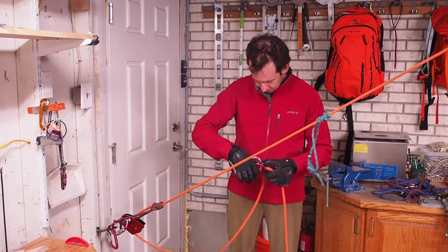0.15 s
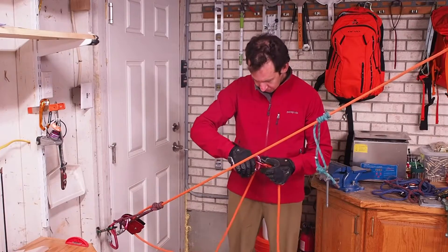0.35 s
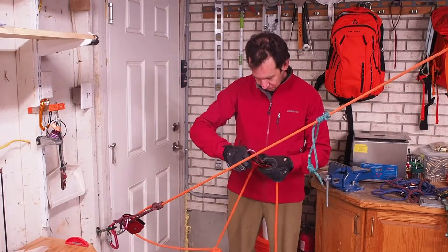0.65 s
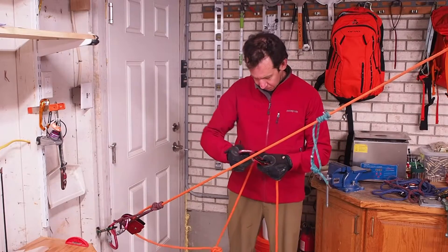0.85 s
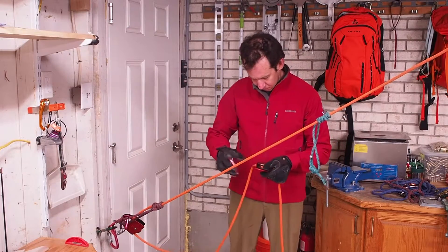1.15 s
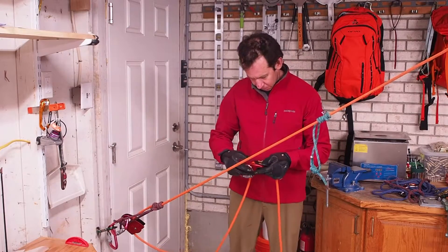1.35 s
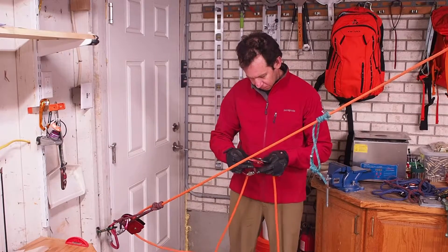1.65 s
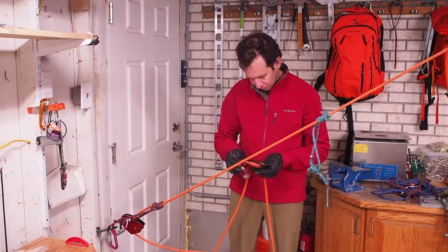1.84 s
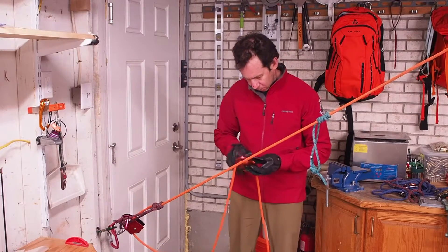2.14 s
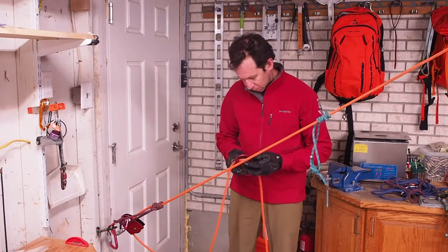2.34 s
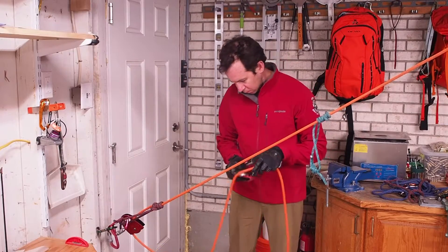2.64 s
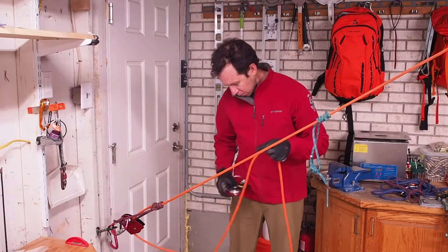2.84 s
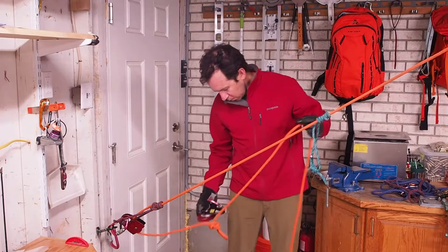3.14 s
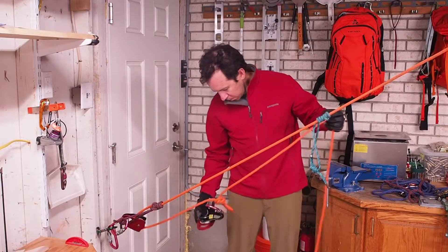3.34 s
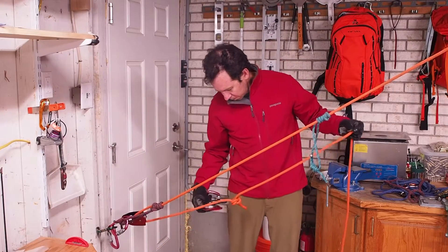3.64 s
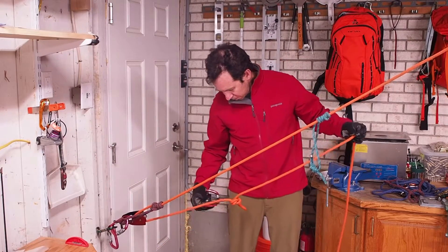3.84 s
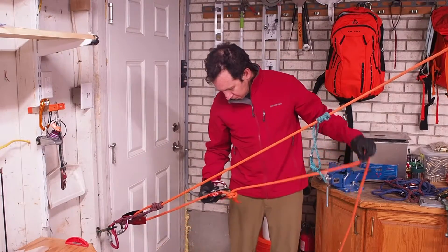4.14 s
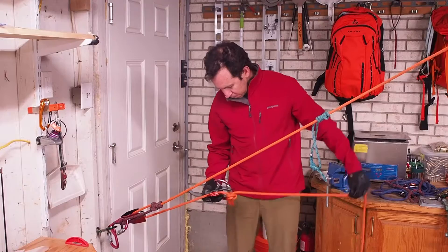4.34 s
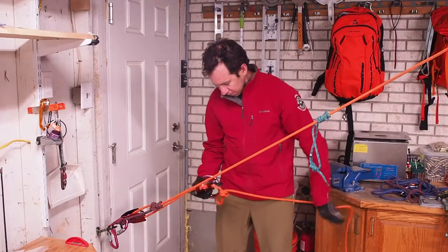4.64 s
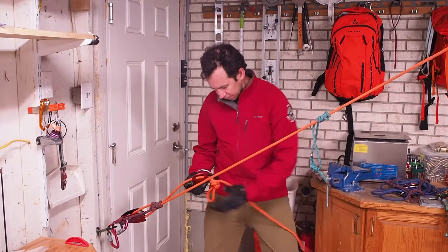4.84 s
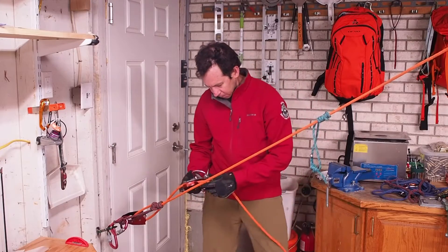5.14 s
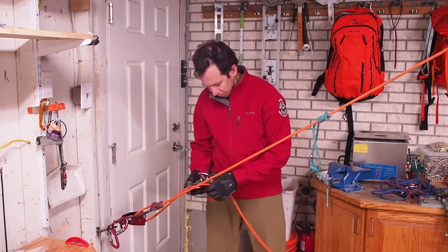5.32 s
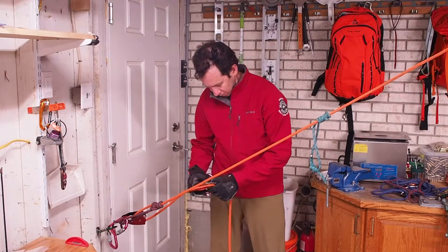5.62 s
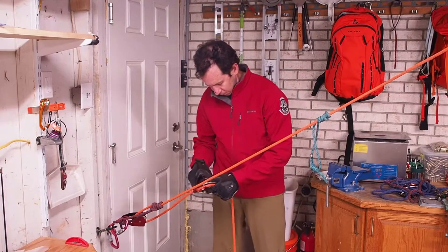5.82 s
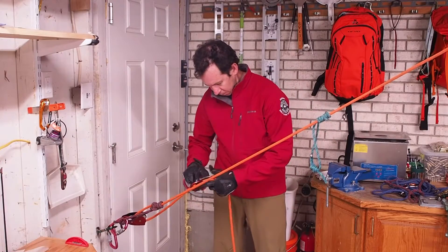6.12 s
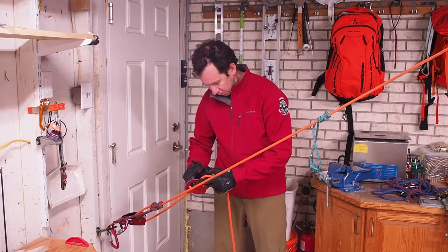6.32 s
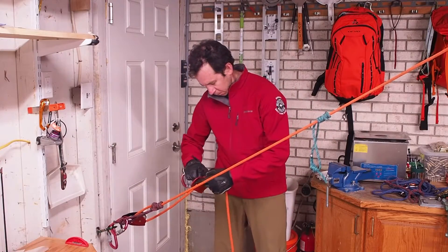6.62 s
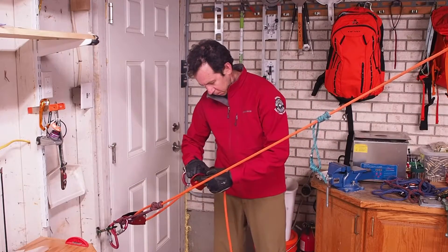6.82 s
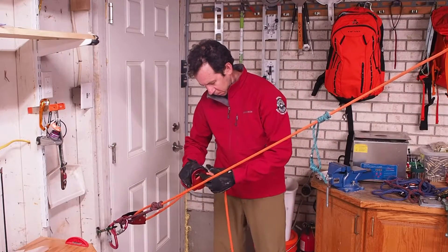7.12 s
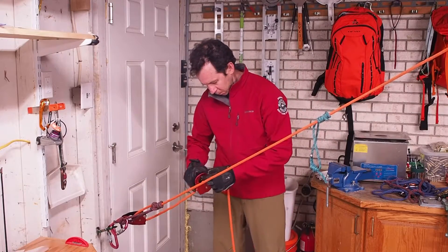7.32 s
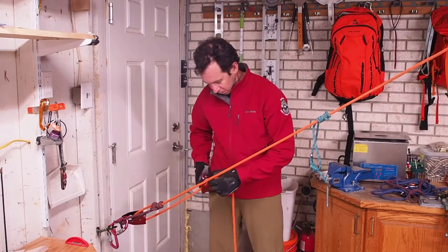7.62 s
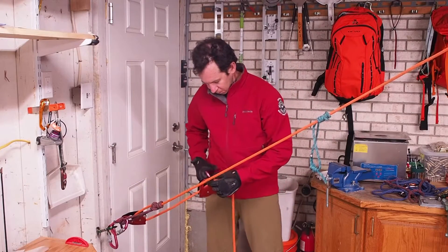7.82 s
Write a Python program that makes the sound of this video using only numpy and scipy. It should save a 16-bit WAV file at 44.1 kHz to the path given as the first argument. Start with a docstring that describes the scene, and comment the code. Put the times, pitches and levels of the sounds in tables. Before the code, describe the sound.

A metal rope pulley scrapes, rattles and clicks lightly from the start, ending in a hard clack at 0.9 seconds. Right after, at 1 second, a carabiner gate snaps shut with a bright crack and a very high ring, the loudest sound. Two smaller pulley clacks follow around 1.4 and 1.6 seconds. At 1.9 seconds aluminium carabiners slide with a soft rustle, then clink several times from 2.2 to 2.7 seconds. A faint slide comes at 3.1 and a dull rope thud at 3.5. Light clinks return from 4.2 to 4.4 seconds and again near 5.3, with jacket rustle, rope running through gloves and soft thuds between. From 5.5 seconds to nearly 8 there are only faint rubs, ticks and dull knocks. The stereo microphone stands a few metres away in a brick garage, with a short echo and low, steady room tone.

```python
"""A rope pulley scrapes and clacks, a few metres from a stereo microphone in a brick garage.
A sprung gate snaps shut, aluminium carabiners slide and clink, and rope drops on the floor as a
climber rigs up. Each metal blow is a broad clack plus ringing modes, and the hard walls answer it.
Gloves and jacket rustle over low room tone; the two hardest hits drive the recorder's limiter."""
import sys
import numpy as np
from scipy import signal
from scipy.fft import rfft, irfft, next_fast_len
from scipy.io import wavfile
from scipy.ndimage import uniform_filter1d

SR = 44100
rng = np.random.default_rng(int(sys.argv[2]) if len(sys.argv) > 2 else 0)


def transcribe(u):
    """Save the signal u as a 16-bit wav file named by the first command-line argument.

    u: samples, shape (n,) or (channels, n), limited to [-1, 1]; the rate is SR.
    q: integer samples, one column per channel.
    """
    v = np.clip(np.atleast_2d(u).T, -1, 1)
    q = np.round(v * 32767).astype(np.int16)
    wavfile.write(sys.argv[1], SR, q)


N = 351477

# blows on the pulley: (time [s], level [dB], brightness [dB], favoured frequency [Hz])
PULLEY_HITS = [(0.2131, -40, 3, 4300), (.234, -26, 4.5, 4740), (.393, -32.5, 4, 2080),
               (0.4432, -28, 7, 3460), (0.7476, -25.5, 6, 4740), (.881, -9.5, 10, 2710),
               (1.3515, -18.5, 4.5, 4330), (1.5527, -24.5, 3, 3460)]
# scrapes, rattles and faint ticks of the pulley and rope:
# (time [s], level [dB], hollowness [dB], rise [s], decay [s])
SCRAPES_AND_TICKS = [(0, -45.5, -2, 0.00087, .015), (.113, -43.5, 10.5, 0.00077, .047),
                     (0.157, -42, 9, 0.0011, 0.022), (.377, -48, -2, 0.0025, .005),
                     (.523, -48.5, 30, 0.0066, .007), (.703, -38, 6.5, 0.00065, 0.11),
                     (.8, -34.5, 8.5, 0.033, 0.012), (1.456, -39, 12.5, 0.013, 0.012),
                     (4.866, -48, 10, 0.0034, .012), (5.575, -52.5, 9, 0.024, .009),
                     (6.906, -65, 6, 0.0016, 0.0036), (7.486, -57, 6, .004, .01)]
# carabiners knocking: (time [s], level [dB], brightness [dB], favoured frequency [Hz], its boost [dB])
CARABINER_HITS = [(2.252, -23.5, -1.5, 3257, -2), (2.339, -22, -0.5, 3257, 11), (2.4275, -27, 3, 6195, 7),
                  (2.481, -38, 4, 7520, 3), (2.6555, -25.5, 5.5, 7480, 4.5), (2.696, -32.5, 4, 3257, 5.5),
                  (4.199, -38.5, 3, 7520, 3.5), (4.281, -46.5, -3, 4690, 4), (4.349, -47.5, -3, 4630, 6),
                  (4.4068, -34, -0.5, 4630, 10), (5.2647, -27, 2, 3758, 5.5), (5.37, -34.5, 1.5, 4690, 7)]
# carabiners sliding: (time [s], level [dB], rise [s], favoured frequency [Hz], its boost [dB])
CARABINER_SLIDES = [(1.912, -36.5, 0.044, 4350, 16), (3.12, -43.5, 0.049, 4700, 6)]
# ringing modes of each metal part: (frequency [Hz], relative energy [dB], t60 [s])
PULLEY_MODES = [(850, -21, 0.066), (1593, -6.5, 0.24), (1820, -19.5, 0.044), (2080, -10, 0.025),
                (2170, -0.5, 0.02754), (2710, 0, 0.0181), (3354, -4, 0.0558), (3460, -2.5, 0.035),
                (4130, 2, 0.023), (4330, -6.5, 0.025), (4740, 7, 0.0083), (5480, -3, .02),
                (6150, -5, 0.022), (7710, -0.5, 0.014), (9370, -4, 0.0765), (10280, -5, 0.0093),
                (10980, -4, 0.23), (12340, -16.5, .04), (13250, -2.5, 0.0336), (15110, -25.5, .05)]
GATE_MODES = [(13340, -17, .08), (12500, -17, 0.09), (12900, -9, 0.15), (13970, -4.5, 0.082),
              (13040, -12.5, 0.13), (14570, -8, 0.14), (13800, -22, 0.11), (14250, -7, 0.1),
              (13800, -27, 0.14), (14660, -35, 0.12), (13400, -18, 0.091), (13730, 3, 0.13),
              (14790, -1.5, 0.051)]
CARABINER_MODES = [(1673, -8, 0.12), (1774, -2.5, 0.058), (3257, 1, 0.15), (3720, -3.5, 0.019),
                   (3758, -0.5, 0.075), (4350, -10, 0.11), (4700, -1, 0.021), (5980, -3.5, 0.0087),
                   (6195, 0.5, 0.052), (7550, 1.5, 0.051), (8630, -7, 0.029), (10200, -31, 0.11),
                   (10470, -11.5, 0.03), (11000, -13.5, 0.099), (11480, -7, .05), (14000, 2, 0.084),
                   (13850, -4, .05), (14820, -9, .08), (15480, -2, .05)]
# the crowd of short-lived modes that makes each part's clack: (frequency [Hz], gain [dB])
PULLEY_CLACK = [(100, -37), (600, -25), (800, -9.5), (1250, -15.5), (1550, -2.5), (2700, -5), (3500, 5.5),
                (4700, 0.5), (5200, -3.5), (7400, -4.5), (8300, -9.5), (11300, -13), (12400, -20),
                (15500, -15)]
GATE_CLACK = [(120, -27), (900, -18), (1600, -11), (2900, -10), (3400, -1), (4400, -1), (5200, -4),
              (6500, -3), (7500, -1), (11000, -1), (12200, -2), (13300, 3), (15100, 1), (16000, -12)]
CARABINER_CLACK = [(100, -32), (800, -19.5), (1250, -9), (1650, -2), (2900, -1.5), (3700, 0), (4700, 3.5),
                   (5300, -3), (7700, -10), (9500, -10), (11500, -10.5), (12400, -26), (13600, 5),
                   (15500, -14)]
# rope falls, dull knocks and glove rubs: (time [s], level [dB], bass [dB], decay [s], resonance [Hz])
THUDS = [(1.215, -47, 9, 0.025, 358), (3.5, -39, 4, 0.048, 850), (3.621, -58, 4, 0.046, 850),
         (4.787, -45.5, 3, 0.019, 350), (5.01, -47, 6.5, 0.018, 308), (5.509, -51, -9, .028, 1600),
         (6.135, -53.5, -5, 0.026, 1060), (7.115, -57, 0, 0.029, 1050), (7.362, -46.5, 4, 0.045, 2110)]
# rope through the gloves and sweeps of the jacket: (time [s], hold [s], relative level [dB])
RUSTLE_STROKES = [(1.914, 0.17, -52), (2.208, 0.025, -52.5), (4.512, 0.37, -56), (4.853, 0.29, -48),
                  (5.3, 0.16, -56.5), (5.75, .03, -58), (6.166, 0.027, -60), (6.52, 0.077, -63),
                  (7.103, 0.061, -60), (7.468, 0.16, -56), (7.612, .005, -52), (7.797, .15, -63.5)]
# spectra of the thuds, the cloth and the room tone: (frequency [Hz], gain [dB])
THUD_COLOUR = [(45, -22), (85, 1.5), (145, 2), (225, -10.5), (390, -4.5), (610, -2), (860, 0.5),
               (1170, -4.5), (1620, -9), (2550, -15.5), (5100, -24.5), (14800, -40.5)]
RUSTLE_COLOUR = [(100, -2), (400, -2.5), (900, 13), (1300, 6), (2000, 9), (2800, 3), (4000, 8.5),
                 (6000, 2.5), (9000, 3.5), (12000, -2), (14000, 7.5), (16000, -11)]
ROOM_TONE_COLOUR = [(15, -34), (25, -10), (141, 0), (263, -15), (335, -12.5), (463, -10), (516, -11),
                    (988, -18), (1070, -14), (1290, -15.5), (2690, -19.5), (3430, -18.5), (8360, -24.5),
                    (14000, -24), (16000, -18.5)]
# room and fan resonances: (frequency [Hz], width [Hz], boost [dB])
ROOM_RESONANCES = [(134, 40, 0), (306, 71, 4.5), (914, 198, 8)]
# likeness of left and right at the microphone: (frequency [Hz], correlation [0-1])
STEREO_CORRELATION = [(60, 0.49), (300, 0.22), (700, 0.6), (1400, 0.61), (3000, 0.056), (7000, .03)]
# reverberation of the brick garage: (frequency [Hz], t60 [s])
GARAGE_T60 = [(160, 0.59), (650, 0.39), (1450, 0.54), (3400, 0.44), (6400, 0.39), (9800, 0.36),
              (14500, 0.26)]

TAIL = np.arange(24576) / SR  # time axis of one blow and its echo [s]
FIRM_DB = -28  # level of an ordinary firm blow


def pulley(crash=0.26):
    """Side plates and sheave clack on the carabiner; the harder the blow, the more crash and less ring."""
    mix = np.zeros((2, N))
    for s, db, bright_db, favoured_hz in PULLEY_HITS:
        shape = strike(db, bright_db, low_db=4.5, top_db=1.5, thinning=0, rise_s=0.00067)
        ring_db = -1 - crash * (db - FIRM_DB)
        blow = metal(shape, PULLEY_MODES, PULLEY_CLACK, ring_db, grit_db=0.28, impact=1.7, click=0.42,
                     detune=0.0102, favoured_hz=favoured_hz, favour_db=9.5)  # plates shift between blows
        add(mix, s, garage(blow, db, direct_db=-8.5, early_db=5.0, pan_db=0.5))
    return mix


def scrapes_and_ticks(high_db=2, top_db=5):
    """Pulley and rope scrape, rattle and faintly tick: long or short runs of slips, more or less hollow."""
    mix = np.zeros((2, N))
    for s, db, hollow_db, rise_s, decay_s in SCRAPES_AND_TICKS:
        shape = (hollow_db, high_db, top_db, rise_s, decay_s)
        slips = metal(shape, PULLEY_MODES, PULLEY_CLACK, ring_db=-7, grit_db=1.2, impact=1.5,
                      detune=0.011, favoured_hz=4330, favour_db=5)
        add(mix, s, garage(slips, db, direct_db=-4.0, early_db=-4))
    return mix


def gate_snap(at_s=0.9823, top_db=0.5, chatter_s=0.00073):
    """The spring throws the gate on the nose: a central crack, with a very high ring beamed to the right."""
    mix = np.zeros((2, N))
    shape = (0, 0, top_db, 0, chatter_s)
    snap = metal(shape, GATE_MODES, GATE_CLACK, ring_db=2.5, grit_db=1.5, impact=3.4,
                 detune=0.00027, click=1)
    left, right = garage(snap, level_db=-0.5, direct_db=-9.0, early_db=10, pan_db=7.0)
    # (frequency [Hz], shift to right [dB]); below 7 kHz it cancels the pan
    beam = [(7000, 7), (8500, -4.5), (11000, 4), (13000, 13.5)]
    left = colour(left, [(hz, -db / 2) for hz, db in beam])
    right = colour(right, [(hz, db / 2) for hz, db in beam])
    add(mix, at_s, np.array([left, right]))
    return mix


def carabiner_clinks():
    """Open aluminium loops knock together and ring clearly."""
    mix = np.zeros((2, N))
    for s, db, bright_db, favoured_hz, favour_db in CARABINER_HITS:
        shape = strike(db, bright_db, low_db=-2.2, top_db=-7.0, thinning=0.78, rise_s=0.0029)
        blow = metal(shape, CARABINER_MODES, CARABINER_CLACK, ring_db=-1.5, grit_db=2.0, impact=1.0,
                     detune=0.00049, favoured_hz=favoured_hz, favour_db=favour_db)
        add(mix, s, garage(blow, db, direct_db=-6.0, early_db=1.0, pan_db=0.1))
    return mix


def carabiner_slides(low_db=2, high_db=1, top_db=-5, decay_s=0.005):
    """Aluminium rubs on aluminium: slips swell until the loop seats, and set it singing."""
    mix = np.zeros((2, N))
    for s, db, rise_s, favoured_hz, favour_db in CARABINER_SLIDES:
        shape = (low_db, high_db, top_db, rise_s, decay_s)
        slide = metal(shape, CARABINER_MODES, CARABINER_CLACK, ring_db=-3, grit_db=3.1, impact=1.0,
                      detune=0.00028, favoured_hz=favoured_hz, favour_db=favour_db)
        add(mix, s, garage(slide, db, direct_db=-5.0, early_db=-3))
    return mix


def thuds(hollow_db=6, rise_share=0.43):
    """Rope and gloves land or rub without ringing: a spread-out push with one broad resonance."""
    mix = np.zeros((2, N))
    for s, db, bass_db, decay_s, hollow_hz in THUDS:
        treble_db = 2 + 4 * np.log2(hollow_hz / 1000)  # smaller things sound higher and crisper
        force = contact(rise_share * decay_s, decay_s, grit_db=2.3, impact=0.5)
        push = colour(force, THUD_COLOUR)
        push = colour(push, [(150, bass_db), (700, 0), (1000, 0), (2000, treble_db)])
        push = colour(push, [(hollow_hz * 0.64, 0), (hollow_hz, hollow_db), (hollow_hz * 1.5, 0)])
        add(mix, s, garage(push, db, direct_db=1.5, early_db=-28))
    return mix


def rustle(attack_s=0.023, release_s=0.067, clump_s=0.006, grain_db=1.5, gain_db=4):
    """Fibres catch and slip in small clumps as the hands move; each stroke rises, holds and dies away."""
    t = np.arange(N) / SR
    strokes = []
    for s, hold_s, db in RUSTLE_STROKES:
        rise = np.clip((t - s) / attack_s, 0, 1)
        fall = np.exp(-np.maximum(t - s - attack_s - hold_s, 0) / release_s)
        strokes.append(amp(db) * rise * fall)
    speed = np.linalg.norm(strokes, axis=0)
    knots = np.arange(0, N / SR, clump_s)
    clumps = amp(grain_db * np.interp(t, knots, rng.standard_normal(len(knots))))
    return amp(gain_db) * speed * clumps * diffuse(lambda hz: amp(read(RUSTLE_COLOUR, hz)))


def room_tone(level_db=-49.5):
    """Steady low murmur of the building, with microphone hiss on top."""
    def gain_at(hz):
        humps_db = sum(db * np.exp(-((hz - f) / width) ** 2) for f, width, db in ROOM_RESONANCES)
        return amp(read(ROOM_TONE_COLOUR, hz) + humps_db)
    return amp(level_db) * diffuse(gain_at)


def strike(db, bright_db, low_db, top_db, thinning, rise_s, dulling=0.347):
    """Shape of a blow for metal(): dull and chattering when gentle, bright and short when firm."""
    softer_db = FIRM_DB - db
    low = low_db + dulling * softer_db - thinning * bright_db
    chatter_s = 0.0019 * 2 ** (softer_db / 22)  # doubles for a blow 22 dB softer
    return low, bright_db, bright_db + top_db, rise_s, chatter_s


def contact(rise_s, chatter_s, grit_db, impact):
    """Force between two parts: a brief impact, then dying tiny slips; a slow rise makes it a scrape."""
    rise_s = np.clip(rise_s, 3e-4, 0.08)
    swell = np.minimum(TAIL / rise_s, 1)
    fall = np.exp(-np.maximum(TAIL - rise_s, 0) / max(chatter_s, 1e-4))
    first_touch = 1 + impact * np.exp(-TAIL / 0.0011)
    uneven = amp(grit_db * np.repeat(rng.standard_normal(len(TAIL) // 32), 32))
    return unit(swell * fall * first_touch * uneven * rng.standard_normal(len(TAIL)))


def metal(shape, modes, clack, ring_db, grit_db, impact, detune, favoured_hz=0, favour_db=0, click=0):
    """A broad clack and ringing modes; the point of contact favours one pitch and tilts the rest."""
    low_db, high_db, top_db, rise_s, chatter_s = shape
    square_hit = click * (TAIL == 0)  # one clean click at the start
    force = unit(contact(rise_s, chatter_s, grit_db, impact) + square_hit)
    ring = np.zeros(len(TAIL))
    for hz, db, t60 in modes:
        boost_db = favour_db * np.exp(-((hz - favoured_hz) / 150) ** 2)
        ring_s = t60 * (1 + max(0.03 * boost_db, 0))  # a favoured mode is also less damped
        keep = amp(-120 / (ring_s * SR))
        energy = signal.lfilter([1 - keep], [1, -keep], force ** 2)  # slips feed it, gloves damp it
        gain = amp(db + boost_db + rng.uniform(-3, 3))
        pitch_hz = hz * (1 + detune * rng.standard_normal())
        ring += gain * np.sqrt(energy) * np.sin(2 * np.pi * (pitch_hz * TAIL + rng.random()))
    body = unit(colour(force, clack)) + amp(ring_db) * unit(ring)
    tilt = [(2200, low_db), (3200, 0), (5000, 0), (6500, high_db), (11000, high_db), (13200, top_db)]
    return colour(body, tilt)


def garage(sound, level_db, direct_db, early_db, pan_db=0, early_s=0.015, build_s=0.0012):
    """At the microphone: direct sound, a quick cluster off the near door and bench, then the brick tail."""
    hz, t, noise = signal.stft(rng.standard_normal((3, len(TAIL))), SR, nperseg=256, noverlap=128)
    same = np.clip(read(STEREO_CORRELATION, hz), 0, 1)[:, None]
    pair = np.sqrt(1 - same) * noise[:2] + np.sqrt(same) * noise[2]
    late = amp(-60 * t / read(GARAGE_T60, hz)[:, None])
    early = amp(early_db) * np.exp(-t / early_s)
    walls = signal.istft(pair * (late + early), SR)[1][:, :len(TAIL)]
    walls *= 1 - np.exp(-TAIL / build_s)
    response = unit(walls) * np.sqrt(2) + amp(direct_db) * (TAIL == 0)
    heard = signal.fftconvolve(sound[None], response, axes=1)[:, :len(TAIL)]
    heard *= amp([[pan_db / 2], [-pan_db / 2]])  # positive is left
    return amp(level_db) * unit(heard) * np.sqrt(2 * SR * 0.078)  # level: rms if packed into 78 ms


def diffuse(gain_at):
    """Noise from all round the microphone, rms one; left and right are more alike in the bass."""
    size = next_fast_len(N, True)
    hz = np.fft.rfftfreq(size, 1 / SR)
    left, other = rfft(rng.standard_normal((2, size)))
    same = np.clip(read(STEREO_CORRELATION, hz), 0, 1)
    right = same * left + np.sqrt(1 - same ** 2) * other
    noise = irfft(np.array([left, right]) * gain_at(hz), size)[:, :N]
    return unit(noise) * np.sqrt(2 * N)


def colour(x, points):
    """Causal (minimum-phase) filter, so that attacks stay sharp."""
    hz = abs(np.fft.fftfreq(len(x), 1 / SR))
    log_gain = np.log(amp(read(points, hz)))
    response = np.exp(signal.hilbert(log_gain).conj())[:len(x) // 2 + 1]
    return irfft(rfft(x) * response, len(x))


def amp(db):
    """Decibels to gain."""
    return 10 ** (np.asarray(db) / 20)


def unit(x):
    """Scales to an energy of one."""
    return x / np.sqrt(np.sum(x ** 2) + 1e-20)


def read(points, hz):
    """Reads a table on a log-frequency axis."""
    f, value = np.transpose(points)
    return np.interp(np.log(hz + 1), np.log(f + 1), value)


def add(mix, s, sound):
    """Mixes a stereo sound in at time s."""
    part = mix[:, max(round(s * SR), 0):][:, :sound.shape[1]]
    part += sound[:, :part.shape[1]]


def scene():
    """The garage as it reaches the microphone, a few metres from the climber."""
    gear = pulley() + scrapes_and_ticks() + carabiner_clinks() + carabiner_slides() + gate_snap()
    return gear + thuds() + rustle() + room_tone()


def record(dry, threshold=1.0, release_s=0.078, attack_s=0.00103, lopsided=0.28, edge_hz=15900):
    """A limiter ducks after the hardest hits; their first millisecond clips. A low-pass follows."""
    over_db = np.maximum(20 * np.log10(abs(dry).max(0) / threshold + 1e-9), 1e-9)
    fall = np.arange(N) / SR / release_s
    held_db = np.exp(np.maximum.accumulate(np.log(over_db) + fall) - fall)
    lag = np.exp(-1 / (attack_s * SR))
    duck_db = signal.lfilter([1 - lag], [1, -lag], held_db)
    limited = (dry - 0.0046) / amp(duck_db)  # the preamplifier sits slightly off zero
    overload = uniform_filter1d(np.maximum(abs(limited) - threshold, 0), size=24)
    clipped = np.clip(limited - lopsided * overload, -1, 1)  # pushed to one side: a low knock
    low_pass = signal.firwin(255, edge_hz, window=("kaiser", 7), fs=SR)
    return signal.oaconvolve(clipped, low_pass[None], "same")


dry = scene()
out = record(dry)
transcribe(out)
```